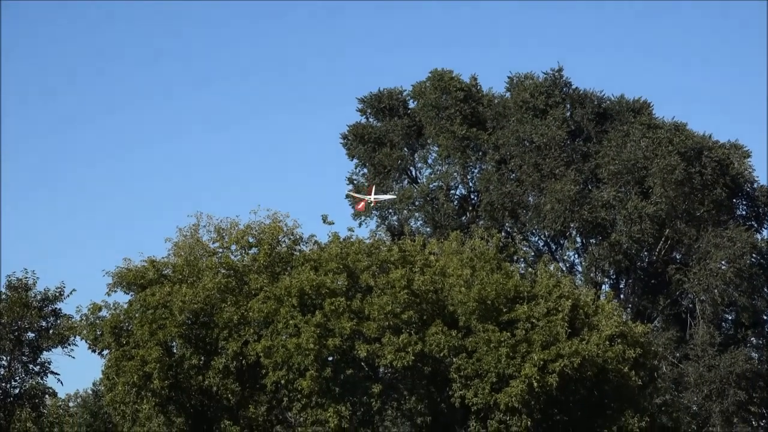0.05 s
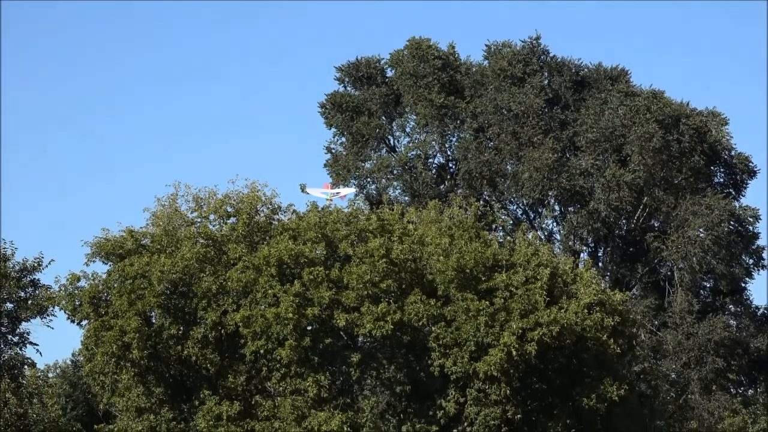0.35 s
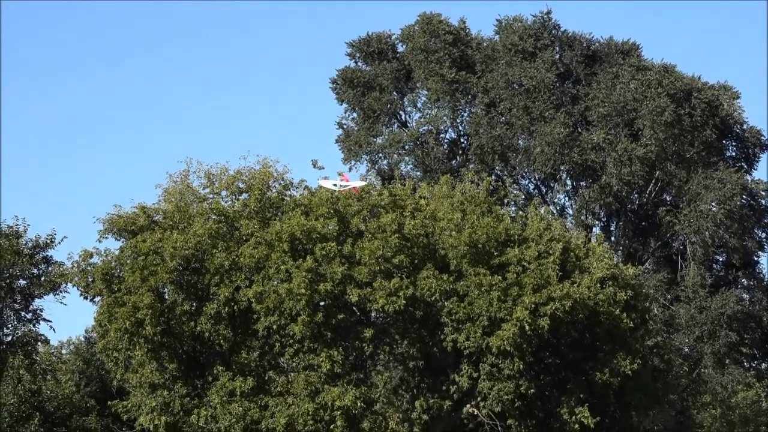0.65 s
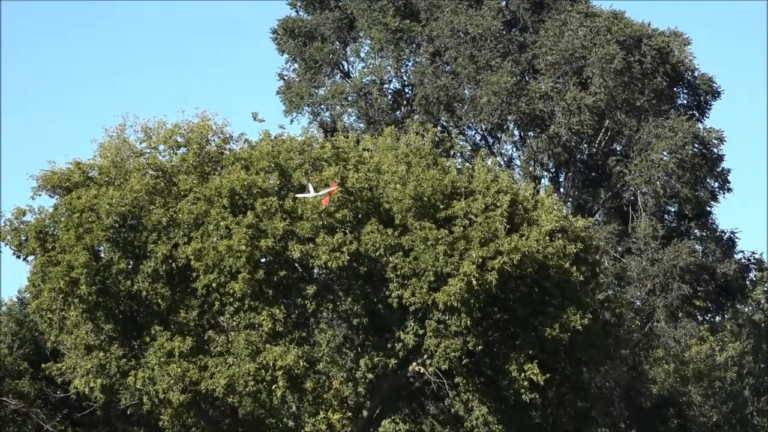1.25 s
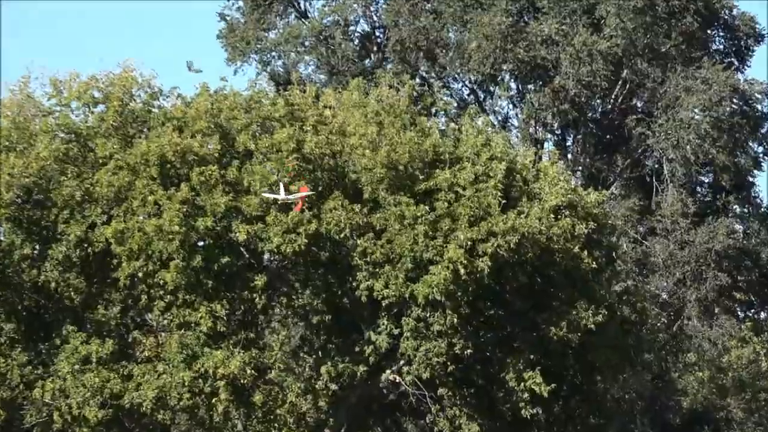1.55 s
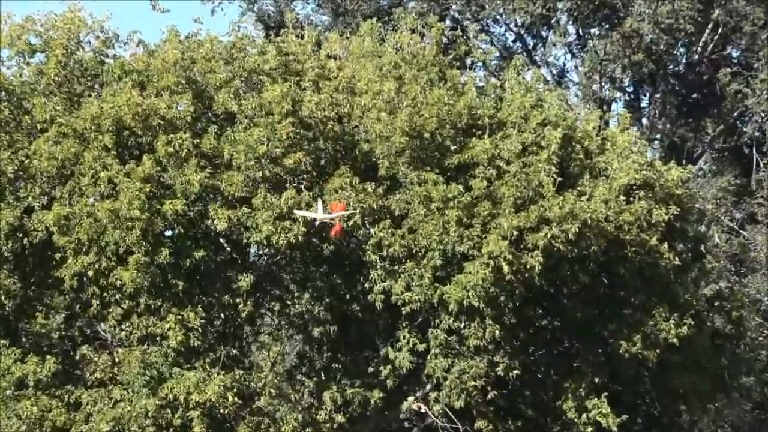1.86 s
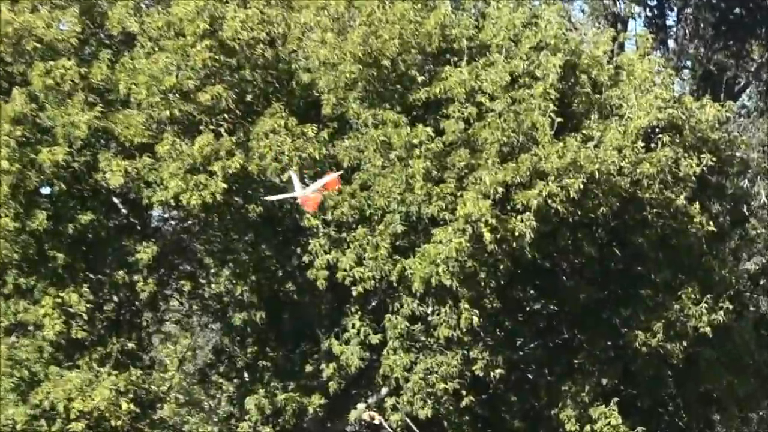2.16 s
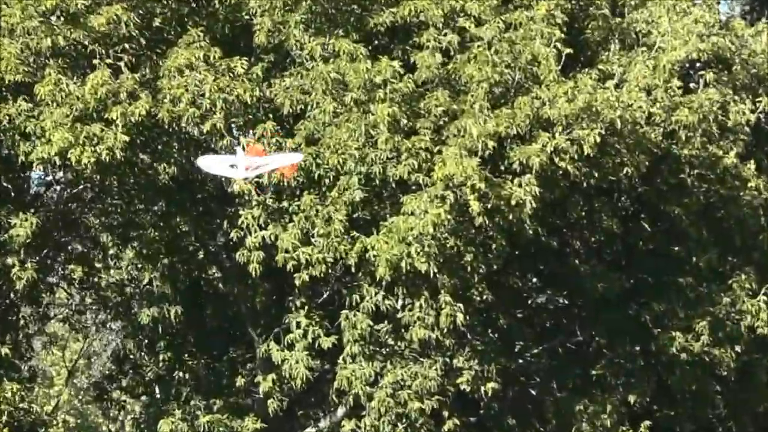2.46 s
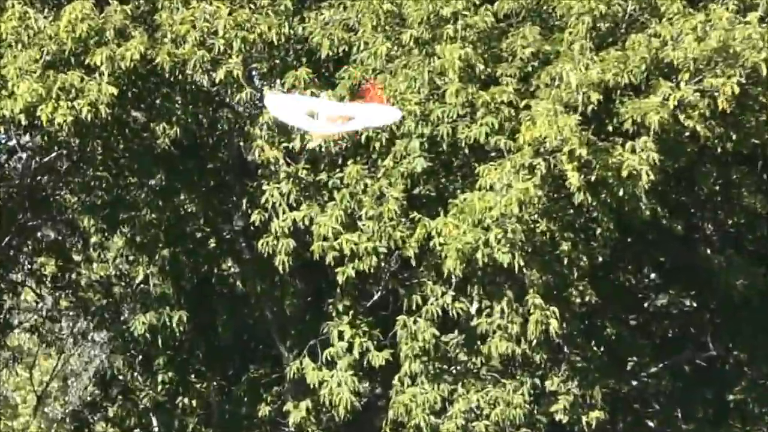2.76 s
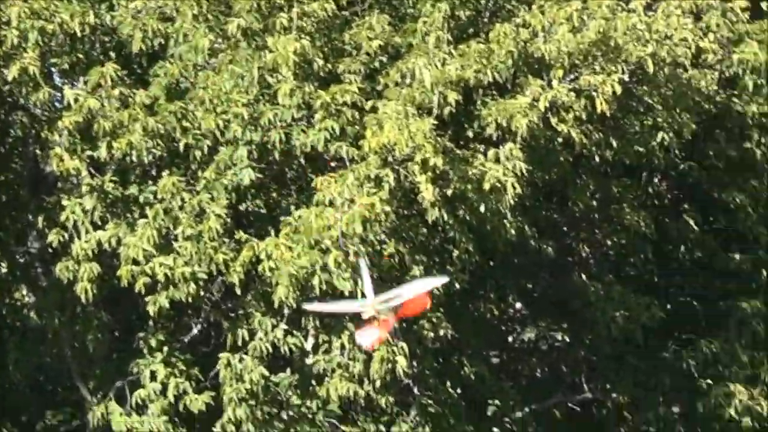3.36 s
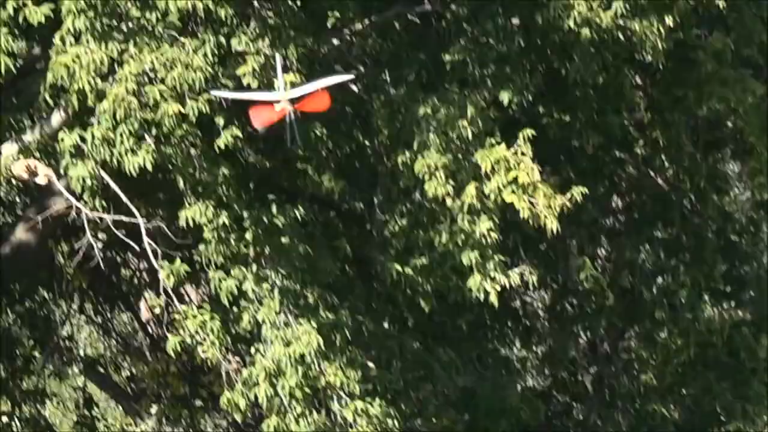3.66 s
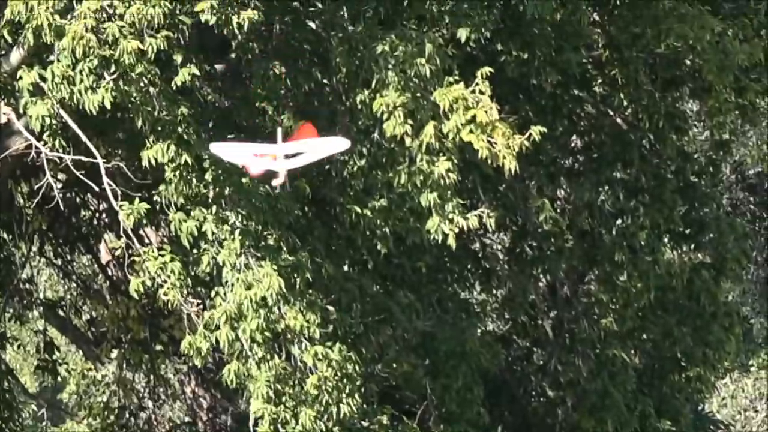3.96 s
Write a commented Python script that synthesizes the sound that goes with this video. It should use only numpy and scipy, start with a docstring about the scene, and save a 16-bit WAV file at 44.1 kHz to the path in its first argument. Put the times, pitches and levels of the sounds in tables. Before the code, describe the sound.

Distant traffic rumbles and hums steadily across an open field, while two crickets trill high on the left and light wind stirs leaves. A far engine swells briefly; then come a sharp click and a soft knock close to the microphone.

```python
"""A still, sunny field edged with trees. Far traffic lays down a bed of rumble, tyre wash and engine hum,
and a light wind stirs the leaves. On the left two crickets trill, one pulse to a wing stroke, at
slightly different rates, so they drift in and out of step. A far bird peeps once. Close up come faint
ticks, a sharp click, a brief rustle and a soft knock, perhaps from handling."""
import sys
import numpy as np
from scipy import signal
from scipy.fft import rfft, irfft, next_fast_len
from scipy.io import wavfile
from scipy.ndimage import uniform_filter1d, map_coordinates

SR = 44100
rng = np.random.default_rng(int(sys.argv[2]) if len(sys.argv) > 2 else 0)


def pcm_store(signal):
    """Save signal as 16-bit PCM."""
    levels = np.round(np.clip(np.atleast_2d(signal), -1, 1) * 32767)
    wavfile.write(sys.argv[1], SR, levels.astype(np.int16).T)


N = 176400

# EQ of the noise layers (frequency [Hz], relative level [dB])
RUMBLE_EQ = [(20, -23), (32, -21), (45, -13), (60, -8.5), (78, 3), (92, -2.5), (125, -2), (150, -5.5),
             (185, -10), (235, -17), (290, -24.5), (400, -36), (800, -60), (1500, -100)]
ROAR_EQ = [(60, -40), (130, -7.5), (180, 0.5), (235, 0), (290, -6.5), (400, -14), (700, -32), (1500, -80)]
TYRE_EQ = [(100, -45), (250, -12.5), (450, -9), (750, -0.5), (1000, -0.5), (1250, 0), (1600, -6.5),
           (2000, -11), (2600, -17), (3100, -20.5), (3700, -27), (5000, -38.5), (8000, -60)]
LEAF_EQ = [(1000, -30), (3000, -4.5), (4600, 2), (5700, -1.5), (6800, -16.5), (9000, -11), (15000, -35)]
HISS_EQ = [(1000, -18), (4000, -0.5), (7000, 4.5), (9500, -1.5), (12000, 1), (15500, -4)]
GRIT_EQ = [(1500, -11), (3000, 4), (6000, -4.5), (8000, -12.5), (11000, -11.5), (15000, -24)]
RUSTLE_EQ = [(600, -40), (1400, -9), (1900, 1), (2700, -5.5), (4000, -20), (9000, -50)]
# fader rides for the layers of the bed (time [s], relative level [dB])
RUMBLE_RIDE = [(0, -42), (.2, -49), (.6, -34), (1.0, -44.5), (1.5, -42), (2.1, -41.5), (2.6, -42.5),
               (3.0, -41), (3.3, -41), (3.6, -39.5), (4, -42.5)]
ROAR_RIDE = [(0, -50), (.7, -50), (1.3, -47), (2.2, -45.5), (2.7, -46.5), (3.3, -46), (4, -48.5)]
TYRE_RIDE = [(0, -43.5), (.6, -42), (1.3, -42), (1.8, -40.5), (2.25, -40), (2.7, -41), (3.3, -41), (4, -41)]
LOW_HUM_RIDE = [(0, -45), (.13, -39), (.55, -39.5), (.75, -43), (1.0, -39), (1.35, -44), (1.6, -39),
                (1.78, -34), (2.1, -38), (2.45, -39), (2.72, -36), (2.92, -47), (3.1, -35), (3.3, -45),
                (3.58, -34.5), (3.74, -41), (3.87, -32), (4, -43)]
REV_OCTAVE_RIDE = [(0, -57), (2.3, -57), (2.6, -48.5), (3.05, -46.5), (3.4, -48), (4, -56)]
LEAF_RIDE = [(0, -65.5), (1, -66), (1.7, -66.5), (2.2, -67), (2.5, -63.5), (3.2, -63.5), (3.6, -64.5),
             (4, -64)]
# stereo width of the noise washes (frequency [Hz], side minus mid [dB])
WASH_WIDTH = [(40, -25), (100, -31), (170, -20), (280, -14), (450, -13), (700, -19.5), (1400, -22),
              (2400, -14.5), (3600, -8), (4800, -14), (6000, -5.5), (7400, -4), (9500, -9), (11000, -12),
              (14000, -22)]
# how the bed leans, band by band (frequency [Hz], left minus right [dB])
BED_BALANCE = [(50, 2), (110, -1.2), (190, -2.5), (300, -2.5), (480, -3), (700, -0.9), (1050, 1.3),
               (1500, 0.3), (2000, -3), (2700, -4.5), (3500, -6), (4600, -1), (6500, -1), (10000, 0)]
# drift of the tyre wash across the image (time [s], left minus right [dB])
TYRE_DRIFT = [(0, -2.5), (.6, -2), (1.5, 0.2), (2.44, 1.2), (3.8, -0.3)]
# faint steady whines (pitch [Hz], level [dB])
WHINE_TONES = [(943, -60.5), (2772, -78), (3020, -76.5), (3302, -77), (4574, -81.5)]
# a far engine revs and eases off (time [s], firing rate [Hz], level [dB])
ENGINE_REV = [(0, 107, -58), (1.6, 106, -54), (2.0, 110.6, -42), (2.27, 122, -37.5), (2.5, 114, -39),
              (2.75, 105, -47), (3.3, 105.2, -52), (4, 103.5, -50)]
# trills of each cricket (first pulse [s], last pulse [s], level [dB])
SLOW_CRICKET = [(.031, 1.074, -51.5), (1.370, 1.908, -54), (1.964, 2.947, -52.5), (3.003, 3.988, -55.5)]
FAST_CRICKET = [(.011, .513, -59), (.612, 1.968, -57.5), (2.190, 3.348, -57.5), (3.397, 3.997, -54.5)]
# faint ticks (time [s], relative level [dB], left minus right [dB], ring pitch [Hz], t60 [s])
TICK_CUES = [(.983, -49, 1, 6200, .015), (1.047, -45, 4, 6320, .018), (2.4225, -44, -1, 5100, .035),
             (2.9427, -45, -1, 4730, .025), (2.9551, -43, -3, 4450, .018), (2.958, -49, -3, 5500, .018)]
# the burst of contacts in the click (time [s], level [dB])
CLICK_CONTACTS = [(3.0196, -40), (3.0199, -30), (3.0213, -31.5), (3.0222, -31), (3.0228, -43),
                  (3.0239, -35)]
# resonances of the click and the knock (frequency [Hz], relative level [dB], t60 [s])
CLICK_RING = [(1020, -3, .018), (1240, -4, 0.015), (1800, -2, 0.013), (3160, -10, .006), (4000, -9, .006),
              (5550, -9, .005), (6400, -18.5, 0.0054), (8300, -26, .004), (10050, -22, .004)]
KNOCK_RING = [(347.4, -1.5, .045), (467, 0.5, .04), (850, -1, .035), (1360, -8, .02), (1990, -7, .018),
              (3400, -19, .012)]


def amp(db):
    """Decibels to gain."""
    return 10 ** (np.asarray(db) / 20)


def unit(x):
    """Normalise to rms 1."""
    return x / np.sqrt(np.mean(x ** 2) + 1e-20)


def along(points, hz):
    """Read a curve on a log frequency axis."""
    freqs, values = np.transpose(points)
    return np.interp(np.log(hz + 1), np.log(freqs + 1), values)


def automation(rows):
    """One automation lane for each column after the time."""
    times, *columns = np.transpose(rows)
    return [np.interp(np.arange(N) / SR, times, column) for column in columns]


def wobble(rate):
    """A smooth random LFO with rate points a second."""
    return map_coordinates(rng.standard_normal(2048), [np.arange(N) * rate / SR], mode="wrap")


def filtered(x, response):
    """Zero-phase EQ; response turns frequency into gain."""
    size = next_fast_len(N + SR // 2)
    return irfft(rfft(x, size) * response(np.fft.rfftfreq(size, 1 / SR)), size)[..., :N]


def pan(db):
    """Left and right gains; positive dB leans left."""
    return amp(np.array([[.5], [-.5]]) * db)


def tone(hz):
    """A sine of rms 1 that follows a pitch curve."""
    return np.sqrt(2) * np.sin(2 * np.pi * (np.cumsum(hz) / SR + rng.random()))


def decay(t, t60):
    """Instant attack at t = 0, then a fall of 60 dB every t60 seconds."""
    return (t >= 0) * np.exp(-np.log(1000) * np.abs(t) / t60)


def wash(eq, patchy_db):
    """Stereo noise of rms 1, mottled with patches of random gain in time and frequency."""
    bands = signal.stft(rng.standard_normal((2, N)), nperseg=512)[2]
    patches = uniform_filter1d(rng.standard_normal(bands.shape[1:]), size=6, axis=0)
    patches = uniform_filter1d(patches, size=14, axis=1)
    noise = signal.istft(bands * amp(patchy_db * unit(patches)), nperseg=512)[1][:, :N]
    spread = lambda hz: np.arctan(amp(along(WASH_WIDTH, hz)))
    mid, side = filtered(noise, lambda hz: amp(along(eq, hz)) * [np.cos(spread(hz)), np.sin(spread(hz))])
    return unit(np.array([mid + side, mid - side]))


def struck(contacts, modes):
    """Every contact rings the same damped modes, in a slightly different mix."""
    out, t = np.zeros(N + SR), np.arange(SR // 8) / SR
    for at_s, db in contacts:
        ring = sum(amp(level + rng.normal(0, 1)) * decay(t, t60) * np.sin(2 * np.pi * hz * t)
                   for hz, level, t60 in modes)
        out[round(at_s * SR):][:len(t)] += amp(db) * ring
    return out[:N]


def field_reverb(x, t60, wet_db):
    """Add the short diffuse tail scattered back by ground and foliage."""
    t = np.arange(SR // 2) / SR
    tail = rng.standard_normal((2, len(t))) * decay(t, t60)
    return x + amp(wet_db) * signal.fftconvolve(x, tail / np.linalg.norm(tail[0]), axes=1)[:, :N]


def traffic():
    """A far road: rumble at the bottom, a dull roar in the low mids, tyre wash on top."""
    rumble_db, = automation(RUMBLE_RIDE)
    roar_db, = automation(ROAR_RIDE)
    tyre_db, = automation(TYRE_RIDE)
    drift_db, = automation(TYRE_DRIFT)
    rumble = amp(rumble_db + 3) * wash(RUMBLE_EQ, patchy_db=1)
    roar = amp(roar_db) * wash(ROAR_EQ, patchy_db=1)
    tyres = amp(tyre_db) * pan(drift_db) * wash(TYRE_EQ, patchy_db=.95)
    return rumble + roar + tyres


def engine_drones():
    """Two far engine hums and faint whines, wavering and fading on their way through the air."""
    low_db, = automation(LOW_HUM_RIDE)
    hum = lambda hz, db: amp(db + 1.4 * wobble(5.01)) * tone(hz + .71 * wobble(4.04))
    hums = hum(hz=104.8, db=low_db) + hum(hz=163.4, db=-43.5)
    whines = sum(amp(db + 2 * wobble(6.12)) * tone(hz + 7 * wobble(25)) for hz, db in WHINE_TONES)
    return hums * pan(db=-.3) + whines


def revving_engine():
    """A far vehicle revs and eases off: its firing note plus an unsteady octave."""
    firing_hz, firing_db = automation(ENGINE_REV)
    octave_db, = automation(REV_OCTAVE_RIDE)
    firing = amp(firing_db) * tone(firing_hz)
    octave = amp(octave_db + 3 * wobble(7)) * tone(2 * firing_hz + 3 * wobble(20))
    return (firing + octave) * pan(db=.4)


def breeze():
    """Light wind flutters the leaves over an even, airy hiss."""
    leaf_db, = automation(LEAF_RIDE)
    leaves = amp(leaf_db + .66 * wobble(12)) * wash(LEAF_EQ, patchy_db=1)
    return leaves + amp(-65.5) * wash(HISS_EQ, patchy_db=.5)


def cricket(trills, period_s, top_hz, sag_hz, half_s, crest_early_s, right_db, right_lag_rad):
    """Each wing stroke is one pulse whose pitch crests, then sags as the wing slows."""
    out, t = np.zeros(N + SR, complex), np.arange(-SR // 50, SR // 50) / SR
    swell = np.cos(np.pi / 2 * np.clip(t / half_s, -1, 1))
    arch_hz = top_hz - sag_hz * np.abs((t + crest_early_s) / half_s) ** 1.47
    for first, last, db in trills:
        for at_s in np.linspace(first, last, round((last - first) / period_s) + 1):
            late_s, accent_db, detune_hz = rng.standard_normal(3) * [.0006, 1.03, 45.7]
            pulse = amp(db + accent_db) * swell * np.exp(2j * np.pi * np.cumsum(arch_hz + detune_hz) / SR)
            out[max(0, round((at_s + late_s) * SR)):][:len(t)] += pulse
    # the wing's file roughens both level and phase
    rasp = amp(1.5 * wobble(350)) * np.exp(.33j * wobble(600))
    song = out[len(t) // 2:][:N] * rasp  # pulses centred on their cues
    return np.real([song, amp(right_db) * song * np.exp(-1j * right_lag_rad)])


def grit():
    """Bright noise that gives the ticks and the click their edge."""
    return unit(filtered(rng.standard_normal(N), lambda hz: amp(along(GRIT_EQ, hz))))


def ticks():
    """Faint close ticks, each a snap of grit with a thin ring."""
    t = np.arange(N) / SR
    return sum(amp(db - 5) * decay(t - at_s, t60) * pan(pan_db) * (grit() + .47 * tone(np.full(N, hz)))
               for at_s, db, pan_db, hz, t60 in TICK_CUES)


def bird(at_s, hz, rise_hz_per_s, half_s, db):
    """One far peep that scoops up and levels off."""
    t = np.clip(np.arange(N) / SR - at_s, -half_s, half_s)
    return amp(db) * np.cos(np.pi / 2 * t / half_s) * tone(hz + rise_hz_per_s * (t - t ** 2 / half_s))


def click():
    """A sharp plastic click: a tight burst of contacts, each with a ring and a spit of grit."""
    t = np.arange(N) / SR
    bursts = sum(amp(db) * decay(t - at_s, t60=.0055) for at_s, db in CLICK_CONTACTS)
    return (struck(CLICK_CONTACTS, CLICK_RING) + amp(-7) * grit() * bursts) * pan(db=-2)


def rustle(at_s, width_s, db):
    """One soft brush of midrange noise, quickly in and out."""
    swell = np.exp(-((np.arange(N) / SR - at_s) / width_s) ** 2)
    return amp(db) * swell * wash(RUSTLE_EQ, patchy_db=1.5)


def knock(at_s, db):
    """One soft contact with a dull, quickly damped body."""
    return struck([(at_s, db)], KNOCK_RING) * pan(db=-2)


def scene():
    """The mix: a dry bed, with crickets and close handling sounds in a touch of reverb."""
    peep = bird(at_s=1.393, hz=2400, rise_hz_per_s=7000, half_s=.021, db=-48.5)
    bed = traffic() + engine_drones() + revving_engine() + breeze() + peep
    bed += rustle(at_s=3.245, width_s=.023, db=-46)
    bed = filtered(bed, lambda hz: pan(along(BED_BALANCE, hz)))
    slow = cricket(SLOW_CRICKET, period_s=.0545, top_hz=8180, sag_hz=759, half_s=.0115,
                   crest_early_s=.00098, right_db=-9.5, right_lag_rad=2.5)
    fast = cricket(FAST_CRICKET, period_s=.0502, top_hz=8280, sag_hz=470, half_s=.012,
                   crest_early_s=.00048, right_db=-7.5, right_lag_rad=2.02)
    crickets = field_reverb(slow + fast, t60=.18, wet_db=-10.5)
    handling = click() + ticks() + knock(at_s=3.646, db=-32.5)
    handling = filtered(handling, lambda hz: 1 / np.sqrt(1 + (hz / 11500) ** 12))  # soften the top
    return bed + crickets + field_reverb(handling, t60=.1, wet_db=-7)


def record(dry):
    """A brick-wall low-pass on the master."""
    return filtered(dry, lambda hz: hz < 15700)


dry = scene()
out = record(dry)
pcm_store(out)
```